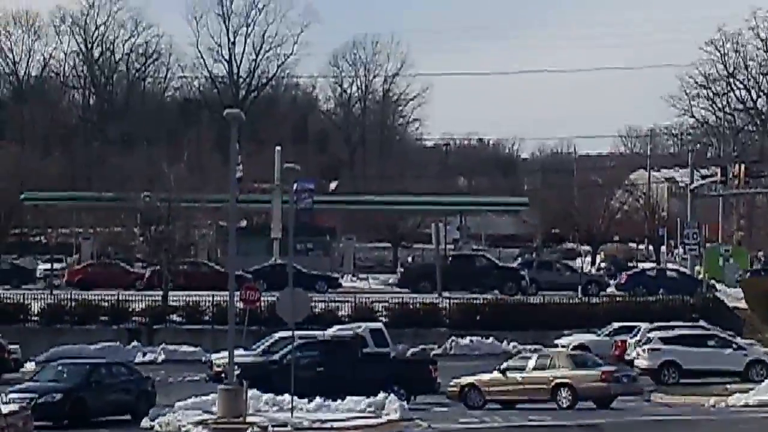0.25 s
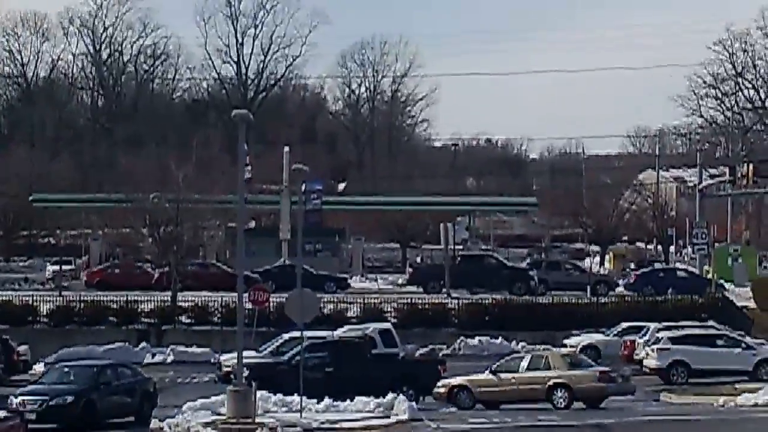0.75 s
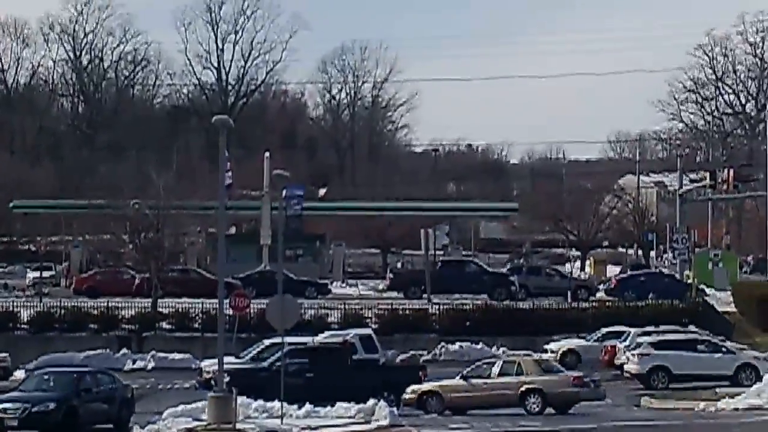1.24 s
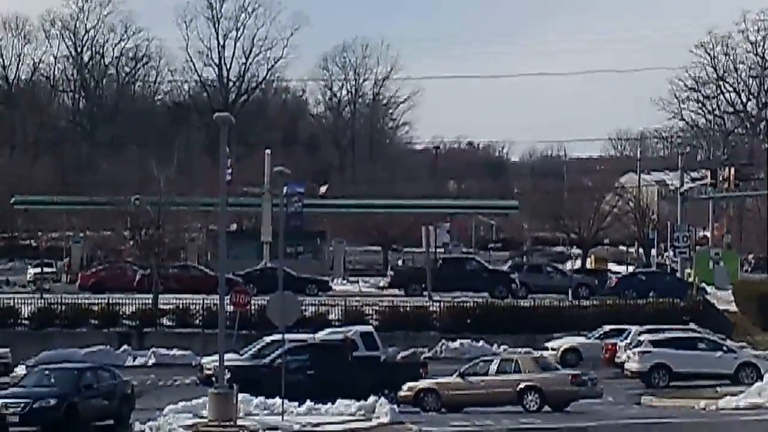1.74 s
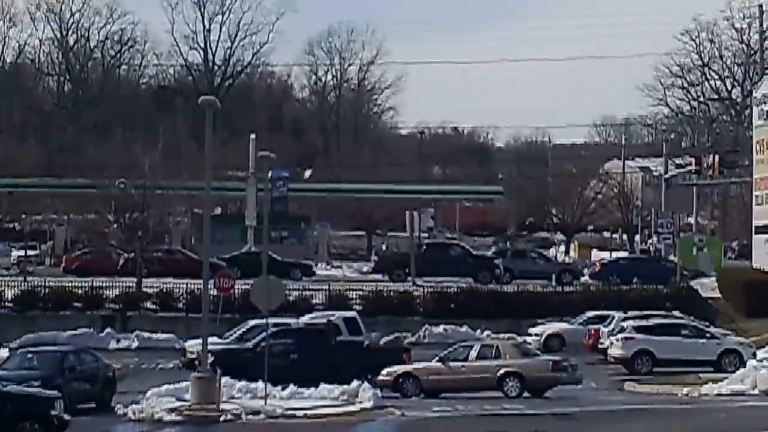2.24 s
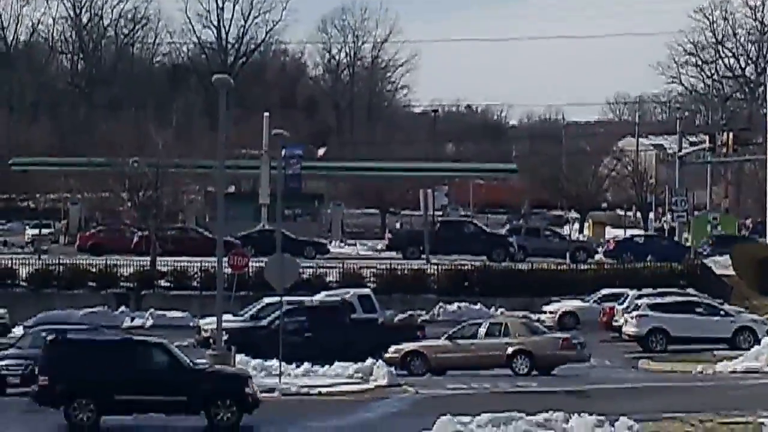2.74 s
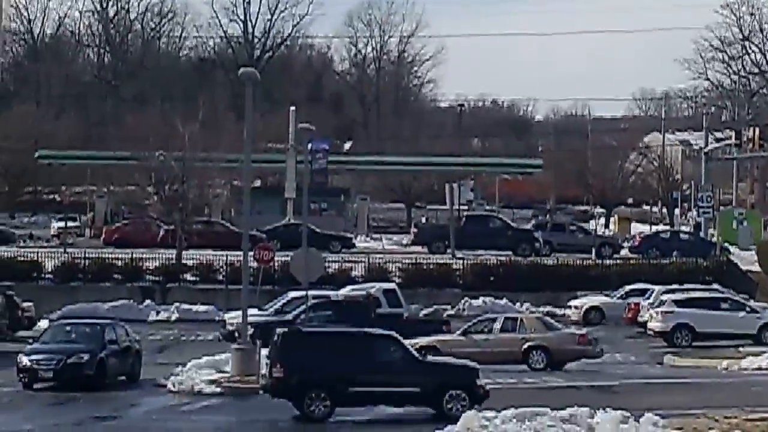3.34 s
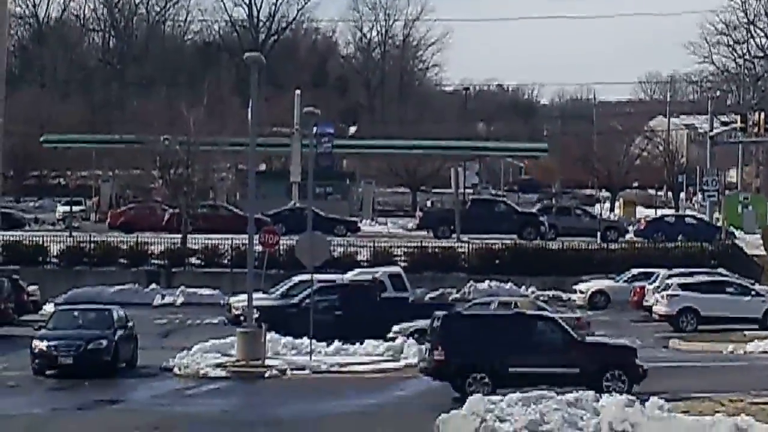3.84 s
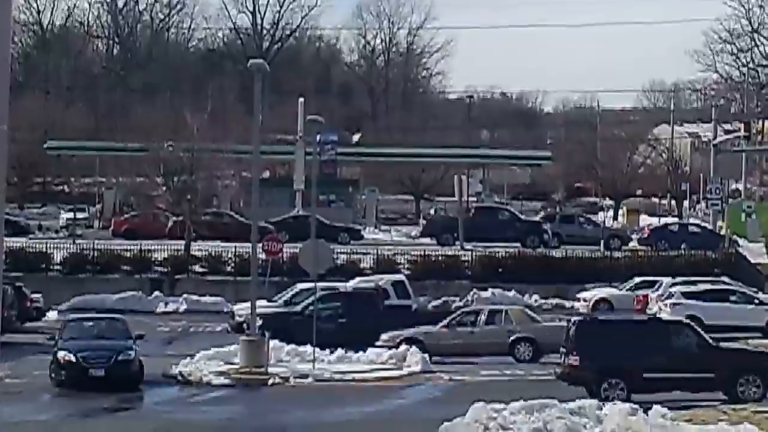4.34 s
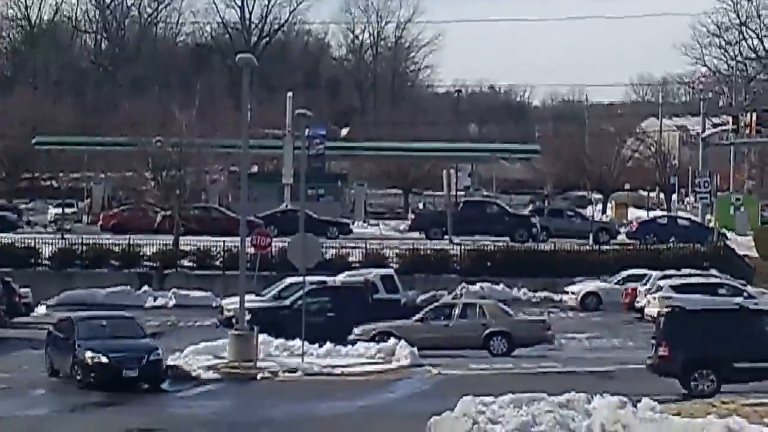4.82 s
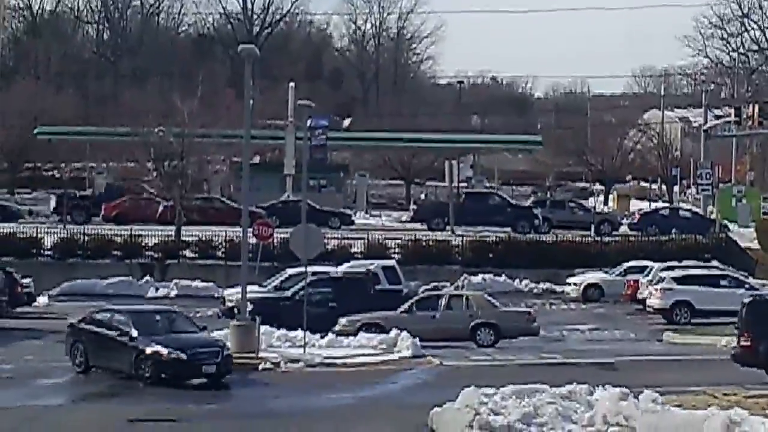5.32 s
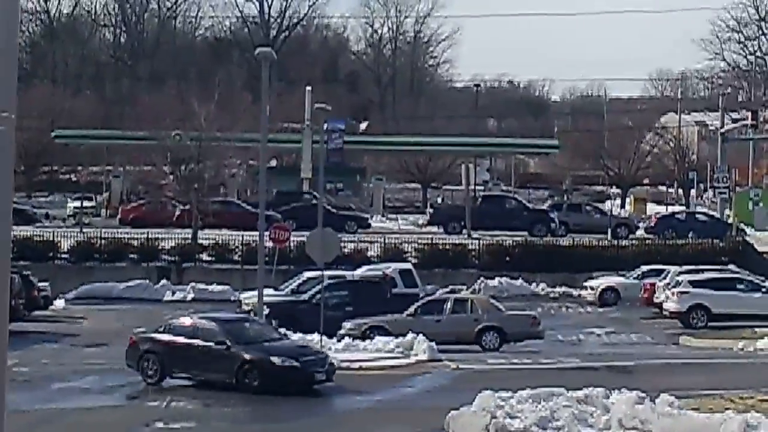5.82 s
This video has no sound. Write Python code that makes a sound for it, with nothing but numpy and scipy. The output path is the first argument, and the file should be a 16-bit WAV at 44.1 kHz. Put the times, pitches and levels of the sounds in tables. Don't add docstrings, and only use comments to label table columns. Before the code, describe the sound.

Steady low traffic rumble and faint hiss lie behind a close wet-road pass. Tyre noise grows quickly, crackling over grit at its loudest, with engine hum beneath. Another engine climbs in pitch and sinks again during a second, smaller swell. A short brake chirp falls between the two. The noise thins away, leaving soft engine drone, tiny ticks and faint high squeaks, heard from across an open lot by a single-channel camera.

```python
import sys
import numpy as np
from scipy import signal
from scipy.fft import rfft, irfft, next_fast_len
from scipy.io import wavfile
from scipy.ndimage import uniform_filter1d

SR = 44100
rng = np.random.default_rng(int(sys.argv[2]) if len(sys.argv) > 2 else 0)


def gain_from_db(level_db):
    decades = np.asarray(level_db, float) / 20
    return 10 ** decades


def inscribe(sig):
    pcm = np.round(np.clip(np.atleast_2d(sig).T, -1, 1) * 32767)
    wavfile.write(sys.argv[1], SR, pcm.astype(np.int16))


N = 267741
TIME = np.arange(N) / SR
SIZE = next_fast_len(N)
HZ = np.arange(SIZE // 2 + 1) * SR / SIZE + 1e-9


def curves(table):
    s, *columns = np.transpose(table)
    return [np.interp(TIME, s, c) for c in columns]


def colour(points):
    hz, db = np.transpose(points)
    return gain_from_db(np.interp(np.log(HZ), np.log(hz), db, -120, -120))


def coloured(spectrum, points):
    part = irfft(spectrum * colour(points), SIZE)[:N]
    return part / part.std()


def walk(rate_hz):
    hold = int(SR / rate_hz)
    steps = np.repeat(rng.standard_normal(N // hold + 1), hold)
    slewed = uniform_filter1d(uniform_filter1d(steps, hold), hold)
    return 1.3 * slewed[:N]


def swell(start_s, length_s):
    return np.sin(np.pi * np.clip((TIME - start_s) / length_s, 0, 1))


def tone(hz, db, wobble_rad):
    phase = 2 * np.pi * np.cumsum(hz) / SR + wobble_rad * walk(6.6)
    return np.sqrt(2) * gain_from_db(db) * np.sin(phase)


def tones(table, flutter_db, rate_hz, wobble_rad):
    out = 0
    for start_s, length_s, hz, db in table:
        level_db = db + flutter_db * walk(rate_hz)
        out = out + swell(start_s, length_s) * tone(np.full(N, 1. * hz), level_db, wobble_rad)
    return out


def drops(rate_hz, spread_db, tail_s):
    hits = (rng.random(N) < rate_hz / SR) * gain_from_db(spread_db * rng.exponential(size=N))
    pole = np.exp(-1 / (tail_s * SR))
    return signal.lfilter([1], [1, -pole], hits)


def firing_gate(depth):
    turn = 2 * np.pi * np.cumsum(curves(ENGINE)[0]) / SR
    return 1 + depth * (np.cos(turn) + 0.74 * np.cos(turn / 2))


# (time [s], nearness [dB], wet road in view [dB], facing [dB], nose bright, tail dull)
CAR = [(0.0, -12.5, -2.5, -0.5), (0.45, -11.5, -5, 4), (0.8, -10, -3.5, 3), (1.1, -8, -4.5, 6),
       (1.45, -7, -2.5, 3), (1.8, -3.5, -5, 6.5), (2.2, -1.1, -4, 5), (2.5, -1.2, -2.5, 1.5),
       (2.8, -1, -0.5, -1), (3.1, -3, -1, -5), (3.35, -5.5, -3.5, -6), (3.62, -7, -13.5, 9),
       (4.05, -5, -10, 5.5), (4.45, -5, -9.5, 0.5), (4.75, -8.5, -9.5, -3), (5.2, -13, -8, -7),
       (5.6, -14.5, -10.5, -2), (6.07, -15, -11, 0)]


def zones(source, points, table, flicker_db, rate_hz, lowest_extra_db=0):
    spectrum = rfft(source, SIZE) * colour(points)
    log_centres = np.log(np.transpose(table)[0])
    near_db, wet_db, facing_db = curves(CAR)
    out = 0
    for k, (_, db, near, wet, facing) in enumerate(table):
        share = np.interp(np.log(HZ), log_centres, np.arange(len(table)) == k)
        part = irfft(spectrum * share, SIZE)[:N]
        level_db = db + near * near_db + wet * wet_db + facing * facing_db
        level_db = level_db + lowest_extra_db * (k == 0)
        out = out + part / part.std() * gain_from_db(level_db + flicker_db * walk(rate_hz))
    return out


# (centre [Hz], level at nearest [dB], shares of nearness, wetness, facing [1])
BODY = [(293, -38, 0.21, 0.025, -0.0086), (634, -34.5, 0.75, -0.14, -0.1)]
# (frequency [Hz], level [dB per Hz])
BODY_COLOUR = [(120, -29), (170, -6), (230, 0), (310, -3.5), (410, -9), (530, -3.5), (800, -2.5),
               (1000, -4), (1250, -23)]


def body():
    rise_s, leaves_s, fall_s, away_db = 0.16, 4.36, 0.66, -5
    away = np.clip((TIME - leaves_s) / fall_s, 0, 1) + np.clip(1 - TIME / rise_s, 0, 1)
    noise = rng.standard_normal(N)
    return zones(noise, BODY_COLOUR, BODY, 0.1, rate_hz=18, lowest_extra_db=away_db * away)


# (centre [Hz], level at nearest [dB], shares of nearness, wetness, facing [1])
ROAR = [(1376, -25, 0.87, -0.3, -0.094), (2115, -23, 0.95, 0.078, -0.029), (3080, -26, 1.06, 0.42, 0.081),
        (4680, -35.5, 1.205, 0.67, -0.026)]
# (frequency [Hz], level [dB per Hz])
ROAR_COLOUR = [(750, -15.5), (950, -6), (1150, -1), (1400, 2.5), (1800, -0.8), (2050, 0.5), (2500, -2.5),
               (3050, -0.5), (3600, -11.5), (4200, -22), (5000, -27.5), (5800, -35.5), (6500, -60)]


def roar():
    patches_db = 0.65 * walk(33)
    source = rng.standard_normal(N) * firing_gate(0.064) * gain_from_db(patches_db)
    return zones(source, ROAR_COLOUR, ROAR, 0.18, rate_hz=25)


# (centre [Hz], level at nearest [dB], shares of nearness, wetness, facing [1])
SPRAY = [(6700, -48.5, 1.57, 0.84, 0.12), (8880, -46, 1.03, 1.11, -0.36), (10840, -51, 0.69, 1.7, 1.55),
         (13700, -54.5, 0.95, 1.2, 0.7)]
# (frequency [Hz], level [dB per Hz])
SPRAY_COLOUR = [(5300, -34), (5900, -6), (6600, -3), (7500, -3.5), (8500, -3.5), (9500, -1), (11000, 1.5),
                (12500, -4.5), (14000, -10), (15600, -16)]


def spray():
    wheel_hz = 12
    surge_db, flutter_db = 0.18 * walk(24), 0.66 * walk(70)
    wheel = 1 + 0.085 * np.cos(2 * np.pi * wheel_hz * TIME + 0.85 * walk(1.8))
    source = rng.standard_normal(N) * firing_gate(0.07) * wheel * gain_from_db(surge_db + flutter_db)
    source = source * (1 + 0.14 * drops(400, 2.6, 0.0018))
    return zones(source, SPRAY_COLOUR, SPRAY, 0.65, rate_hz=23)


# (time [s], firing rate [Hz], level [dB])
ENGINE = [(0.0, 75.3, -53.5), (0.6, 76.9, -46.5), (0.9, 77.4, -47.5), (1.5, 77.8, -41.5), (2.1, 78.8, -39),
          (2.4, 78.4, -34.5), (2.85, 78.9, -36), (3.3, 77.9, -34), (3.65, 77, -35), (4.2, 77.9, -38.5),
          (4.8, 78.1, -44), (5.4, 78.6, -44), (6.07, 80, -50.5)]


def passing_engine():
    half_db, upper_db, upper_quiet_db = -27, -7, -7
    upper_start_hz, sags_s, sag_hz_per_s, upper_rise_s = 155.4, 2.1, 2.6, 0.15
    intake_db, intake_fade_db_per_s, intake_waver_db = 3, 3.5, 3
    hz, db = curves(ENGINE)
    upper_hz = upper_start_hz - sag_hz_per_s * np.maximum(TIME - sags_s, 0)
    upper_level_db = db + upper_db + upper_quiet_db * np.clip((sags_s - TIME) / upper_rise_s, 0, 1)
    out = tone(hz, db, 0.13) + tone(hz / 2, db + half_db, 0.2) + tone(upper_hz, upper_level_db, 0.12)
    intake = gain_from_db(db + intake_db - intake_fade_db_per_s * TIME + intake_waver_db * walk(4.01))
    pull = gain_from_db(-51) * swell(2.95, 0.9)
    return out + (intake + pull) * tone(3 * hz / 2, 0, 0.14)


# (frequency [Hz], level [dB per Hz])
TRAFFIC = [(15, -42), (25, -24), (40, -7), (55, -8), (90, -3.5), (130, 2.5), (180, -7), (260, -27)]
# (frequency [Hz], level [dB per Hz])
FAR_HISS = [(5300, -40), (6000, -7), (7000, -7), (8600, 0.5), (10500, 0), (12500, -5), (14000, -10),
            (15600, -13)]


def traffic():
    hiss_db, rumble_db, engine_share = -64, -40.5, 0.55
    low = coloured(rfft(rng.standard_normal(N), SIZE), TRAFFIC)
    hiss = coloured(rfft(rng.standard_normal(N), SIZE), FAR_HISS)
    engine_db = curves(ENGINE)[1]
    low_db = rumble_db + engine_share * (engine_db - engine_db.max()) + 1.1 * walk(3.13)
    return hiss * gain_from_db(hiss_db) + low * gain_from_db(low_db)


# (start
# [s], length [s], centre [Hz], width [Hz], level [dB])
SWISHES = [(0.0, 1.0, 2900, 700, -40), (1.6, .45, 2050, 250, -31), (1.9, .35, 750, 250, -39),
           (3.75, .6, 6900, 1400, -67), (0.0, 1.9, 308, 40, -45), (.1, .8, 560, 30, -52),
           (.1, .7, 470, 25, -53), (1.25, .55, 1300, 120, -33), (1.9, .5, 2120, 200, -30),
           (2.6, .26, 3020, 200, -30), (2.85, .3, 3700, 350, -35), (3.1, .32, 3750, 400, -39),
           (2.9, .5, 5000, 400, -47), (4.0, .5, 1150, 150, -34), (1.83, .2, 4800, 1100, -45),
           (2.255, .06, 3500, 900, -35), (2.42, .07, 3600, 700, -37), (3.29, .1, 4300, 1400, -45),
           (2.74, .12, 2200, 600, -30), (2.95, .25, 1600, 500, -31), (2.5, .1, 1600, 400, -30)]


def swishes():
    out = np.zeros(N)
    for start_s, length_s, hz, width_hz, db in SWISHES:
        span = slice(int(max(start_s, 0) * SR), int((start_s + length_s) * SR))
        age = TIME[span] - start_s
        peak = signal.iirpeak(hz, hz / width_hz, SR)
        ring = signal.lfilter(*peak, rng.standard_normal(3 * SR))
        ring = signal.lfilter(*peak, ring)
        out[span] += ring[:len(age)] / ring.std() * gain_from_db(db) * np.sin(np.pi * age / length_s)
    return out


# (start [s], length [s], frequency [Hz], level [dB])
HUMS = [
    (0.02, 0.65, 223, -42.5),
    (1.15, 1.7, 218.9, -47.5),
    (1.8, 2.1, 184.5, -48),
    (0.05, .6, 109, -49),
    (3.5, 1.3, 526.6, -50),
    (5.7, 0.43, 525, -49.5),
]


def hums():
    return tones(HUMS, 3.3, 12, 0.31)


# (time [s], peak [dB], low part [dB], top part [dB], length [ms])
GRIT = [(1.843, -23.5, -30, -46, 4.7), (2.269, -40, -35, -48, 11), (2.424, -40, -46, -54, 10),
        (2.6567, -38, -44, -52, 9), (2.8065, -37, -39, -46, 11), (2.960, -39, -38, -55, 9),
        (3.103, -46, -41, -58, 13), (3.345, -49, -41, -68, 14), (3.423, -43, -43, -72, 12),
        (3.449, -54, -52, -70, 8.05), (4.94, -54, -58, -70, 31), (5.205, -56, -64, -70, 15),
        (5.555, -60, -67, -61, 14), (5.7255, -51, -57, -69, 10), (5.779, -56, -66, -71, 10),
        (5.9076, -57, -67, -70, 8.4), (5.97, -53, -66, -71, 24)]


def grit():
    peak = [(8300, -14), (10500, -4), (12800, -9)]
    low = [(3500, -16), (4700, 2), (5800, -12), (7800, -9)]
    top = [(11500, -9), (13000, 0), (15600, -6)]
    noise = rfft(rng.standard_normal(N), SIZE)
    out = 0
    for column, points, trim_db in ((1, peak, -10.5), (2, low, -4), (3, top, -4)):
        env = np.zeros(N)
        for row in GRIT:
            first = int(row[0] * SR)
            age = TIME[:min(SR // 6, N - first)]
            fall = np.exp(-(1000 * age / row[4]) ** 2) + 0.47 * np.exp(-age / 0.037)
            rise = 1 - np.exp(-age / 0.0015)
            env[first:first + len(age)] += gain_from_db(row[column] + trim_db) * rise * fall
        out = out + env * coloured(noise, points)
    return out


# (time [s], firing rate [Hz], level [dB])
REVS = [
    (2.1, 104.4, -55),
    (2.62, 115.2, -47),
    (2.85, 121, -33),
    (3.45, 135, -47),
    (3.7, 138.1, -52),
    (3.95, 136.8, -47),
    (4.2, 130.1, -31.5),
    (4.75, 109.3, -38.5),
    (4.97, 102.5, -52),
]
# (multiple of firing [1], start [s], length [s], level [dB])
OVERTONES = [
    (1.75, 2.75, .9, -40),
    (2, 3.1, .5, -42),
    (2, 3.9, .85, -44),
    (1.75, 3.9, .3, -44),
]


def revving_engine():
    hz, db = curves(REVS)
    running = (TIME > REVS[0][0]) & (TIME < REVS[-1][0])
    out = running * tone(hz, db, 0.15)
    for multiple, start_s, length_s, level_db in OVERTONES:
        out = out + swell(start_s, length_s) * tone(multiple * hz, level_db, 0.18)
    return out


# (start [s], length [s], frequency [Hz], level [dB])
CHIRPS = [
    (3.16, 0.26, 660, -39),
    (2.38, 0.13, 322, -41),
    (5.015, .065, 11930, -66),
    (5.225, 0.072, 11950, -67),
    (5.295, 0.032, 11920, -68),
    (5.33, .2, 11950, -77),
    (5.9, 0.043, 11850, -71),
]


def chirps():
    return tones(CHIRPS, 3.4, 100, 1.2)


def scene():
    car = body() + roar() + spray() + passing_engine() + swishes() + grit() + chirps()
    return (car + revving_engine() + hums() + traffic())[None]


def band_limit(x):
    return signal.sosfilt(signal.butter(12, 15670, fs=SR, output="sos"), x)


# (centre [Hz], width [Hz])
NOTCHES = [(6000, 970), (7980, 1800)]


def record(dry):
    for hz, width_hz in NOTCHES:
        dry = signal.lfilter(*signal.iirnotch(hz, hz / width_hz, SR), dry)
    return band_limit(dry)


dry = scene()
out = record(dry)
inscribe(out)
```